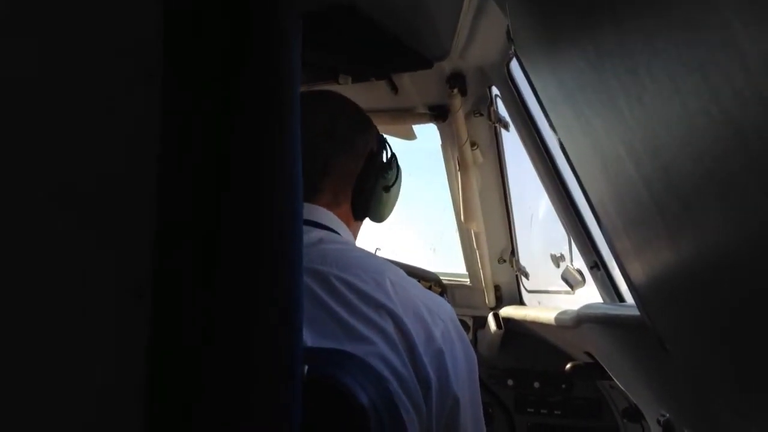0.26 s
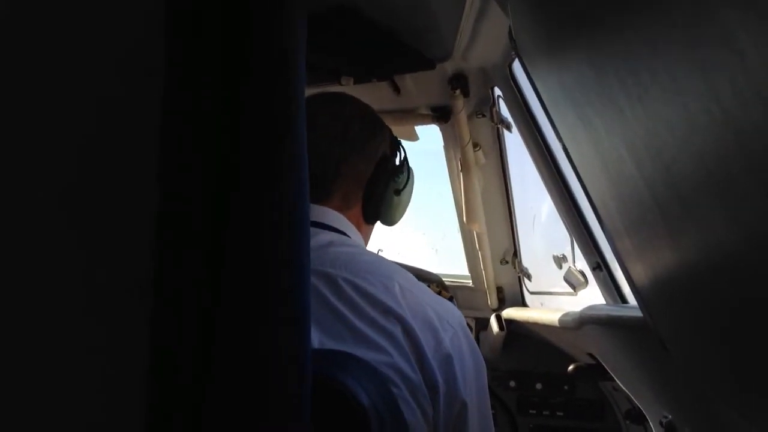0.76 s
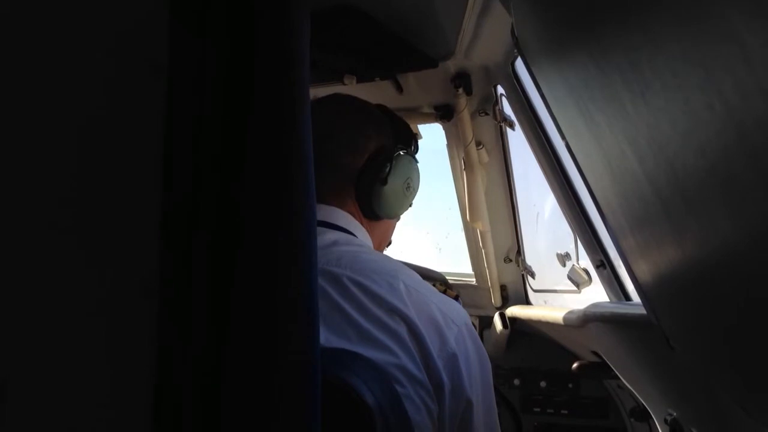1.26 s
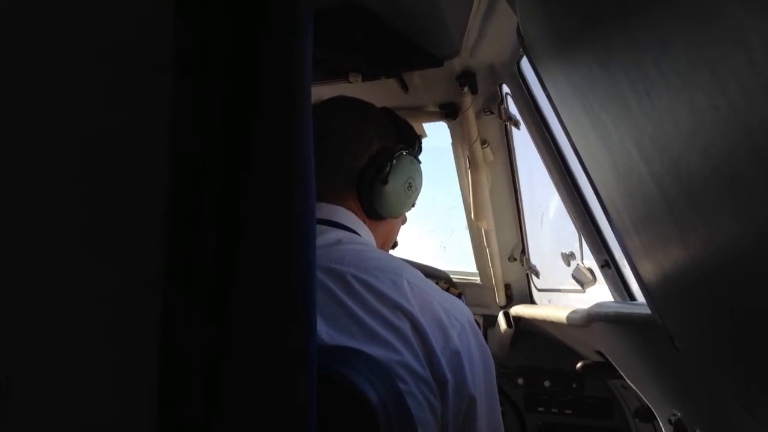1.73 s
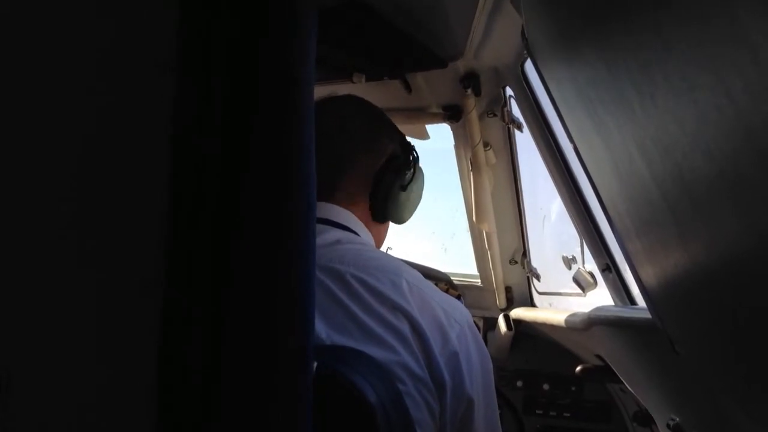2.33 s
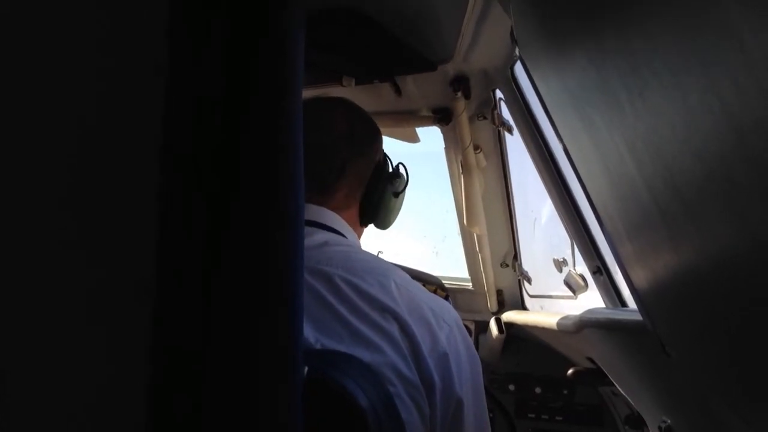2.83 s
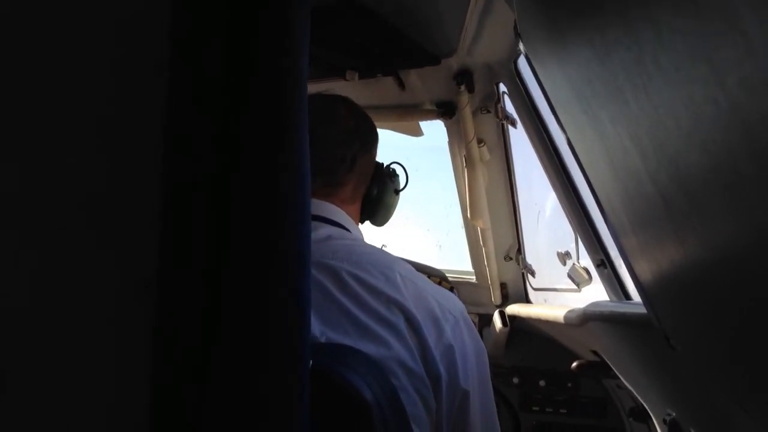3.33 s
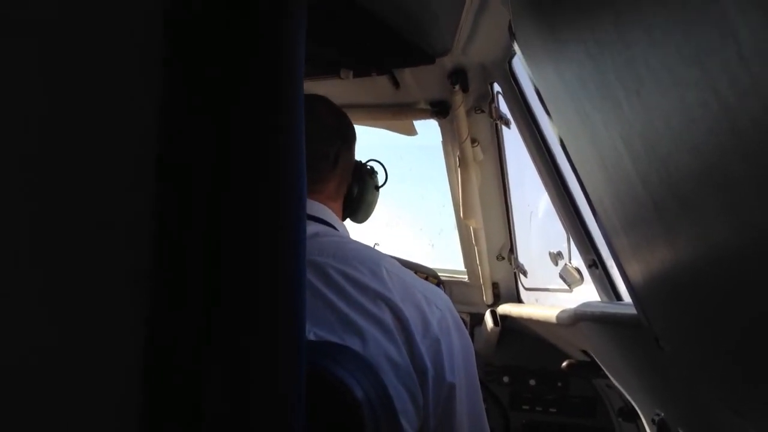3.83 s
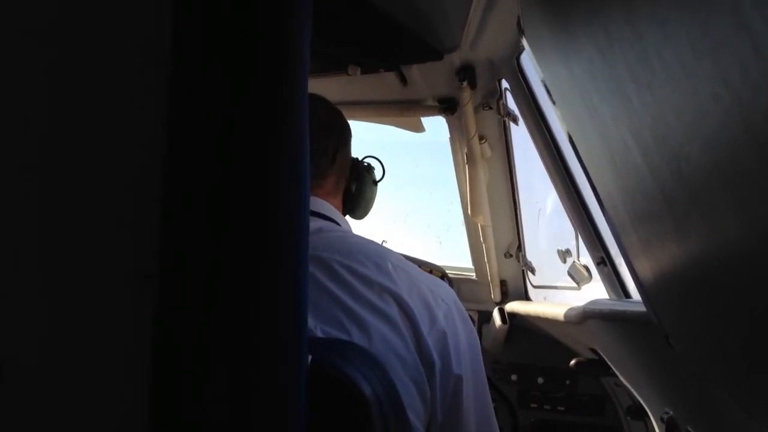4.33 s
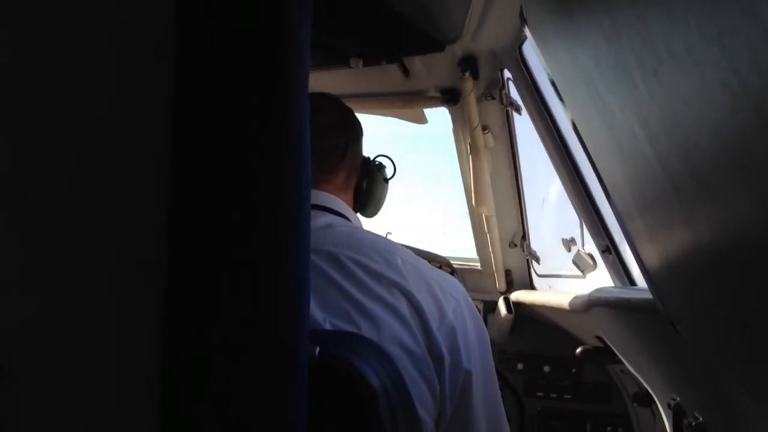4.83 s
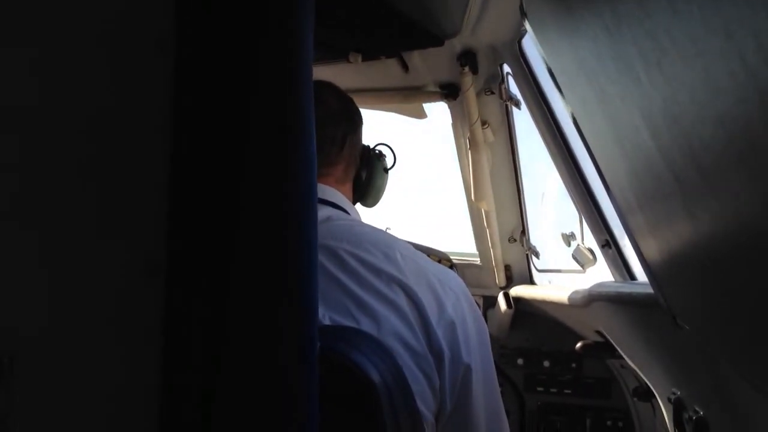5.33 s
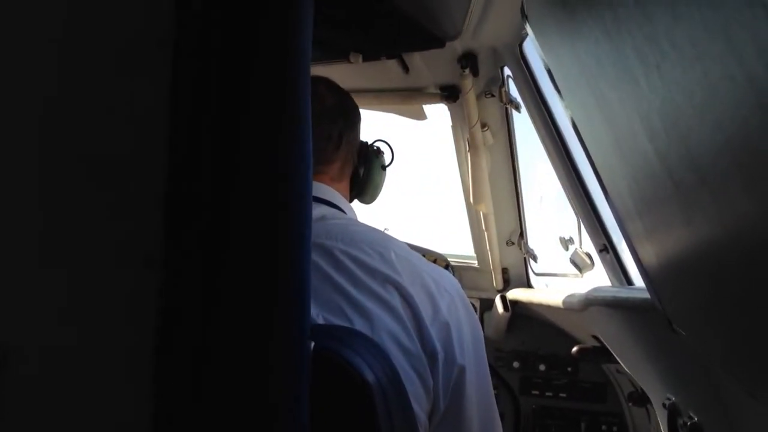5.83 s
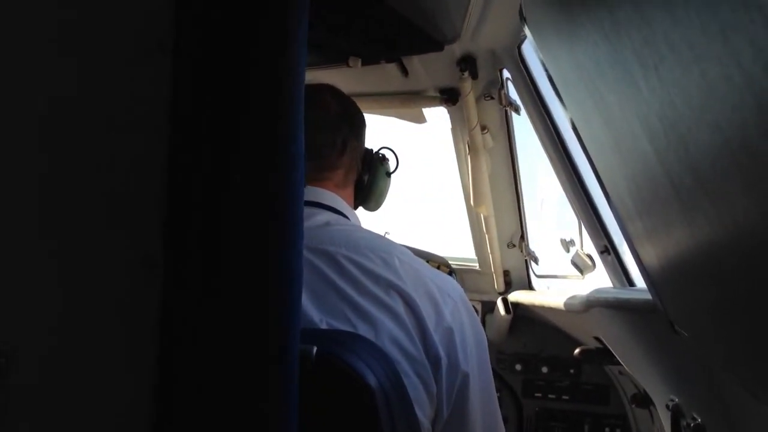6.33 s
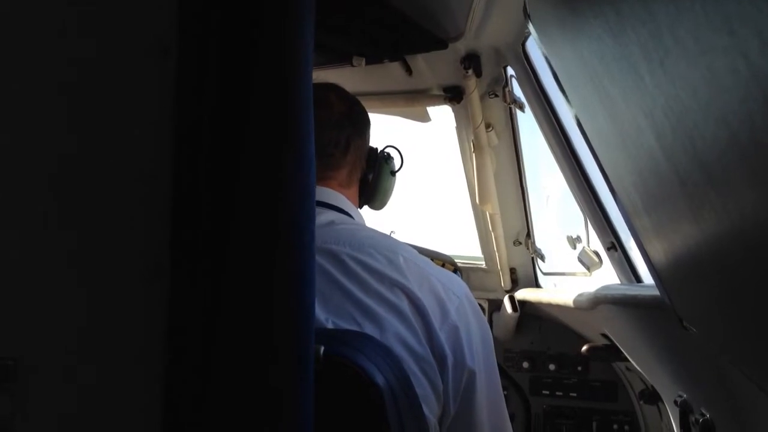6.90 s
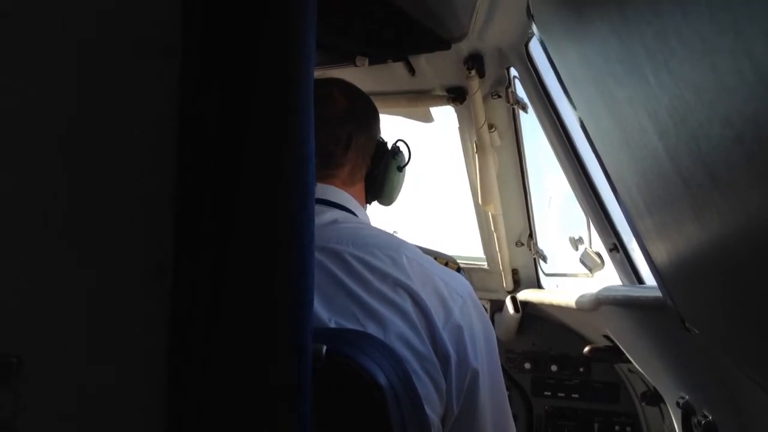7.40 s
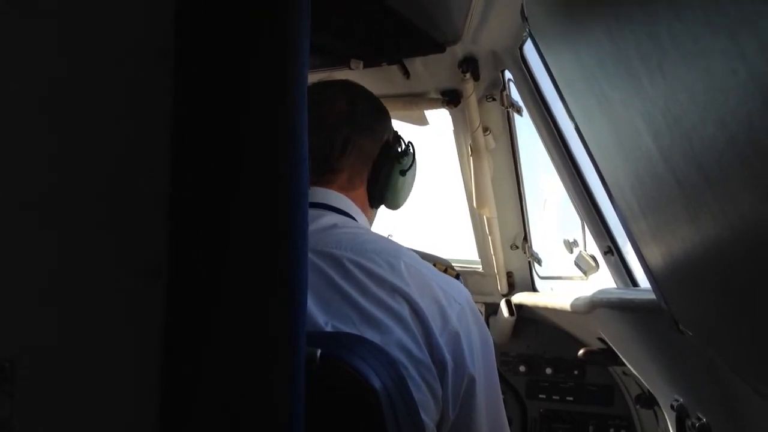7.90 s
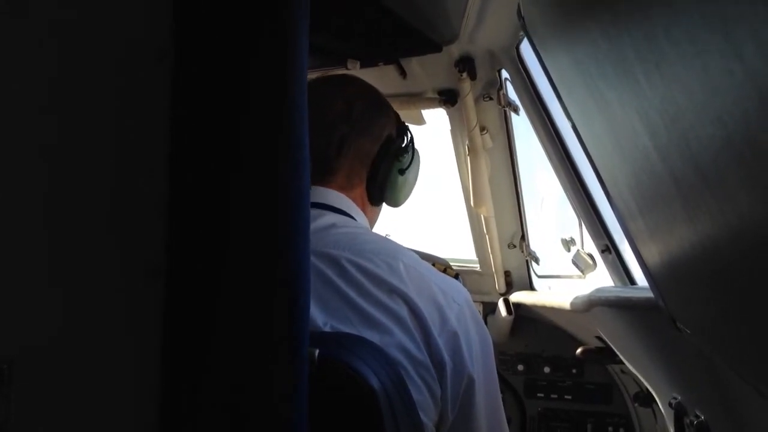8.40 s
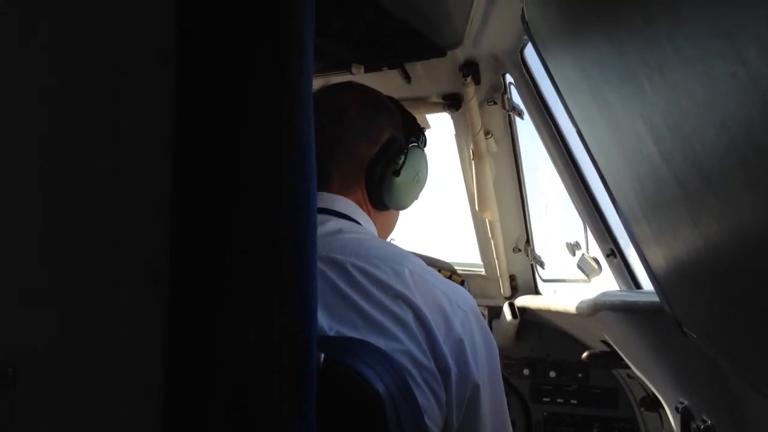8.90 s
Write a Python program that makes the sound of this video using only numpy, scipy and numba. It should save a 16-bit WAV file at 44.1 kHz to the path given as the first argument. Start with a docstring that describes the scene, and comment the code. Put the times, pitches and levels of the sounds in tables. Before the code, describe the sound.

Already in flight at 0 s, a loud twin-propeller drone fills a small aircraft cockpit, heard from inside behind the pilot. The hum is low and rounded, near 164 Hz, with weaker overtones and little change in pitch. Two nearly equal propeller tones beat slowly: the hum thins almost to nothing at about 0.1 s, swells, then sinks again near 1.3, 2.7, 4.0, 5.2, 6.4, 7.9 and 9.0 s, fullest roughly midway between. Beneath it runs constant air rush along the hull, dark and muffled, slightly uneven, with faint resonant colouring from panels and vents. Automatic level control lifts this rush at each hollow and presses it down under each swell. Very thin, faint, high whines flicker over it. The mono sound is dense and compressed, continuing unbroken to the end at about 9.1 s.

```python
"""From the start, two turboprops drone in a small cockpit, summed from pairs of slightly unlike tones.
The drone first cancels after 0.1 s, then swells and cancels about every 1.3 s, last at about 9 s.
All along, air rushes past (noise shaped in pitch and time) and a faint high whine flickers (thin sines).
An automatic gain control lifts the rush and whine each time the propellers cancel."""
import sys
import numpy as np
from scipy import signal
from scipy.io import wavfile
from scipy.ndimage import uniform_filter1d, minimum_filter1d
from numba import njit

SR = 44100
rng = np.random.default_rng(int(sys.argv[2]) if len(sys.argv) > 2 else 0)


def generate_wav(signal):
    """Clip the signal to [-1, 1] and save it as 16-bit WAV at the path in sys.argv[1]."""
    frames = np.transpose(np.atleast_2d(signal))
    scaled = np.clip(frames, -1, 1) * 32767
    pcm = np.round(scaled).astype(np.int16)
    wavfile.write(sys.argv[1], SR, pcm)


N = 403505  # length in samples, about 9.15 s


def gain_of(db):
    """Turns decibels into a factor to multiply a wave by."""
    return 10 ** (np.asarray(db) / 20)


def evened(x):
    """Scales a signal to an rms (average strength) of 1."""
    return x / np.sqrt(np.mean(x ** 2) + 1e-20)


def curve(rows):
    """Joins (time, value) rows by straight lines, giving one value per sample."""
    t, value = np.transpose(rows)
    return np.interp(np.arange(N) / SR, t, value)


def wander(top_hz):
    """Irregular wavering of rms 1: 24 slow sines from 1 Hz up to top_hz, the faster ones weaker."""
    step = 256  # samples between computed points
    t = np.arange(0, N + step, step) / SR
    hz = np.geomspace(1, top_hz, num=24)[:, None]
    start_turns = rng.random(hz.shape)
    waves = np.sin(2 * np.pi * (hz * t + start_turns)) / np.sqrt(hz)
    return np.interp(np.arange(N) / SR, t, evened(waves.sum(0)))


# moments when the two propellers' main pressure waves cancel: (t/s)
CANCEL_TIMES = [.1, 1.315, 2.715, 3.955, 5.228, 6.378, 7.906, 9.04]
# the main waves add up fully at this share of the way from one cancelling to the next
AGREE_SHARE = 0.54
# blade rate midway between the two propellers: (t/s, f/Hz)
BLADE_RATE = [(0, 164.5), (1.3, 164.5), (1.9, 165.4), (2.5, 164.7), (3, 164.5), (4.7, 164.5), (5.5, 164.15),
              (6, 164.45), (7.6, 164.5), (8.2, 164.3), (9.15, 164.3)]
# multiples of the blade rate, with levels before the load curve: (multiple, slower propeller level/dB,
# faster propeller level/dB, starting phase of the slower/turns, lead of the faster/turns)
BLADE_ORDERS = [(1, -8.5, -9.2, 0, .5), (2, -29, -27.5, .65, .57), (3, -38.5, -43, .1, .79),
                (4, -52, -55, .3, .45), (5, -53, -59, .3, .45), (6, -50, -57, .3, .45),
                (7, -52, -59, .3, .45)]
# level change of both propellers together: (t/s, level/dB)
PROPELLER_LOAD = [(0, -2.5), (2, -1.5), (3.3, -1), (4.6, -1.5), (5.8, -1.8), (7.1, -0.8), (8.5, -1.9),
                  (9.15, -3)]


def propellers():
    """Two near-equal tones per order beat; the faster propeller gains one blade passage per beat."""
    # cancelling and agreeing moments take turns, with one more moment guessed at each end
    agree_times = CANCEL_TIMES[:-1] + AGREE_SHARE * np.diff(CANCEL_TIMES)
    t = np.sort(np.r_[CANCEL_TIMES, agree_times])
    t = np.r_[2 * t[0] - t[1], t, 2 * t[-1] - t[-2]]
    # the faster propeller gains half a blade passage between neighbouring moments
    gained = curve(np.c_[t, (np.arange(len(t)) + 1) / 2])
    mid_turns = np.cumsum(curve(BLADE_RATE)) / SR
    slow_turns = mid_turns - gained / 2
    fast_turns = mid_turns + gained / 2

    out = np.zeros(N)
    for k, slow_db, fast_db, start, lead in BLADE_ORDERS:
        shake_db = .38 * min(k, 5) ** 1.1  # higher orders waver more, up to the fifth
        slow_gain = gain_of(slow_db + shake_db * wander(20))
        slow = slow_gain * np.cos(2 * np.pi * (k * slow_turns + start))
        fast_gain = gain_of(fast_db + shake_db * wander(24))
        fast = fast_gain * np.cos(2 * np.pi * (k * fast_turns + start + lead))
        out += np.sqrt(2) * (slow + fast)
    out *= gain_of(curve(PROPELLER_LOAD))
    # the walls give a little more one way than the other, which mixes the two propellers' tones
    return out - 0.115 * out ** 2


# tone colour of the air along the hull, heard through the walls, before scaling: (f/Hz, level/dB per Hz)
RUSH_COLOUR = [(20, -36.5), (45, -17.5), (65, -5), (100, -3.5), (140, 1.5), (215, -2.5), (265, 0.5),
               (430, -11), (500, -6), (800, -18.5), (1500, -28), (2200, -37.5), (5000, -49), (9000, -57),
               (15200, -62.5)]
# panels and vents that the rush excites, mean pitch and strength: (f/Hz, width/Hz, level over the rush/dB)
PANEL_HUMPS = [(256, 16, 3), (370, 77, 3.5), (480, 33, 2.5), (888, 30, 4.5), (1292, 100, 6), (1487, 49, 6),
               (1597, 68, 5), (1803, 63, 6.5), (2615, 60, 6), (2666, 60, 7.5), (3400, 100, 3),
               (3550, 130, 5), (4660, 170, 4.5), (11400, 800, 4.5)]
# slight chance rise and fall of the noise, around RUSH_DB: (t/s, level/dB)
RUSH_LEVEL = [(0, -0.5), (1.1, 1.05), (2.3, 0.3), (4.6, 0.1), (7.1, 0.27), (9.15, 0)]
RUSH_DB = -20.5  # rms level before the rush level curve


def rush(patchy_db=0.5, gust_db=-0.49, fitful=0.39, moody=0.18, waver=.25):
    """Air noise made from random short spectra, with hull colour, panels, patches, gusts and bass lumps."""
    size, hop = 2048, 512  # samples per spectrum and between spectra
    frames = N // hop + 2 * size // hop
    hz = np.fft.rfftfreq(size, 1 / SR)

    def unsteady(smooth_frames):
        """Random strength over time, of rms 1; more smoothing makes it slower."""
        return evened(uniform_filter1d(rng.standard_normal(frames), size=smooth_frames))

    real, imag, patches = rng.standard_normal((frames, len(hz), 3)).T
    # patches are smoothed over pitch, then over time
    patches = uniform_filter1d(patches, size=30, axis=0)
    patches = evened(uniform_filter1d(patches, size=5, axis=1))
    gusts = unsteady(6)
    lumps = unsteady(4)

    f, level_db = np.transpose(RUSH_COLOUR)
    colour_db = np.interp(np.log(hz + 1), np.log(f + 1), level_db)
    buffet_db = 2.5  # unsteadiness of the deepest bass
    bass = 1 / (1 + (hz / 130) ** 2)
    field_db = colour_db[:, None] + patchy_db * patches + gust_db * gusts
    field_db += buffet_db * bass[:, None] * lumps
    # the panels are shaken in fits, each on its own, and their pitch wavers a little
    for centre_hz, width, db in PANEL_HUMPS:
        fits = unsteady(3)
        spells = unsteady(30)
        sway = unsteady(8)
        hump = np.exp(-2 * ((hz[:, None] - centre_hz) / width - waver * sway) ** 2)
        field_db += db * hump * (1 + fitful * fits + moody * spells)

    spectra = (real + 1j * imag) * gain_of(field_db)
    air = signal.istft(spectra, nperseg=size, noverlap=size - hop)[1]
    air = air[size:][:N]
    return gain_of(RUSH_DB + curve(RUSH_LEVEL)) * evened(air)


# lone thin tones of gears and accessories, before drift and flicker: (f/Hz, rms level/dB)
LONE_TONES = [(1049, -54.5), (2857, -79.5), (14669, -94)]
# speed of the engine that makes the thin tones: (t/s, parts per thousand off its mean)
ENGINE_DRIFT = [(0, .1), (1.8, -.5), (4.5, .2), (5.7, -.1), (8.1, .7), (9.15, .1)]
# one tone of each comb (a row of evenly spaced tones), before drift: (f/Hz)
COMB_TONES = [8859, 11385, 13192]
# where each comb is loudest and how it falls away, before flicker:
# (steps above its COMB_TONES tone, rms level there/dB, loss per step/dB)
COMB_LEVELS = [(.6, -74, 6), (.4, -80, 3.5), (0, -86.5, 4.5)]
# comb tones lie one blade rate of the slower propeller apart, with this many on each side
COMB_STEP_HZ, COMB_SIDES = 164.1, 4


def whine():
    """Thin sine tones that drift together with engine speed, each flickering on its own."""
    steps = np.arange(-COMB_SIDES, COMB_SIDES + 1)
    combs = []
    for hz, (top, db, fall_db) in zip(COMB_TONES, COMB_LEVELS):
        comb_hz = hz + COMB_STEP_HZ * steps
        comb_db = db - fall_db * abs(steps - top)
        combs.append(np.c_[comb_hz, comb_db])
    speed = 1 + curve(ENGINE_DRIFT) / 1000

    out = np.zeros(N)
    for hz, db in np.vstack([LONE_TONES, *combs]):
        turns = np.cumsum(hz * (speed + 2e-4 * wander(30))) / SR
        flicker = gain_of(db + 3 * wander(25))
        out += np.sqrt(2) * flicker * np.cos(2 * np.pi * turns)
    return out


def scene():
    """Adds up the propellers, the rush and the whine at one microphone."""
    return (propellers() + rush() + whine())[None]


@njit
def release(cut, rate):
    """Follows a rise at once and lets go slowly."""
    out, now = np.empty(len(cut)), 0.
    for i in range(len(cut)):
        now = max(cut[i], now + rate * (cut[i] - now))
        out[i] = now
    return out


CEILING = .71  # peak level the limiter aims at, 1 being full scale
EDGE_HZ = 15290  # treble above this is cut away


def record(dry):
    """A lagging gain control turns loud sound down, a quick limiter tames peaks, a filter cuts the top."""
    # the microphone passes no steady pressure
    x = signal.lfilter([1, -1], [1, -.997], dry[0])
    # the gain follows recent power, with a lag of a tenth of a second; zi is the power it starts from
    keep = np.exp(-1 / (.1 * SR))
    power = signal.lfilter([1 - keep], [1, -keep], x ** 2, zi=[.07])[0]
    heard_db = 10 * np.log10(power + 1e-9)
    over_db = np.maximum(heard_db + 18.5, 0)
    x = x * gain_of(5.5 - .62 * over_db)
    # the limiter looks 2 ms ahead and back, and lets go over about 29 ms
    room = minimum_filter1d(np.minimum(CEILING / (abs(x) + 1e-9), 1), size=177)
    cut = release(1 - room, 1 / (0.029 * SR))
    x = x * (1 - uniform_filter1d(cut, size=89))
    low_pass = signal.firwin(2047, EDGE_HZ, window=("kaiser", 9), fs=SR)
    return signal.oaconvolve(x, low_pass, "same")[None]


dry = scene()
out = record(dry)
generate_wav(out)
```